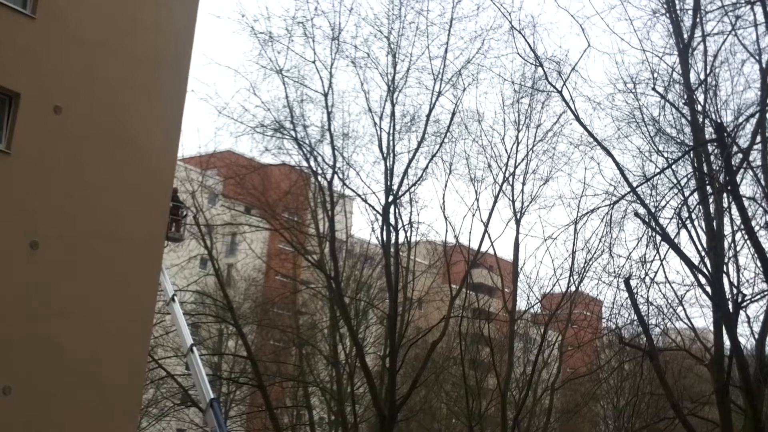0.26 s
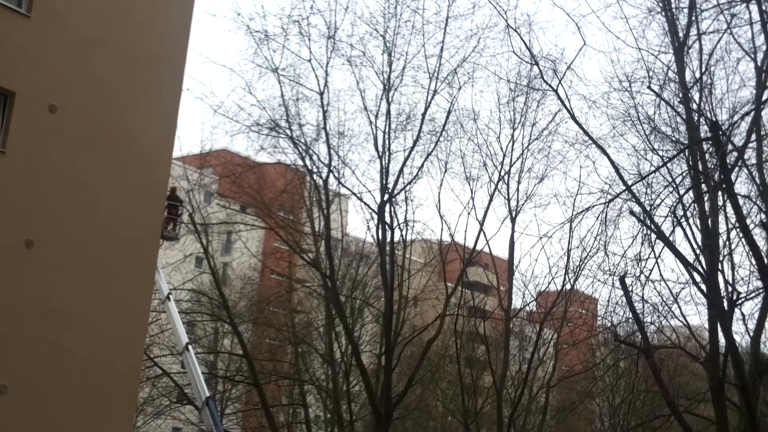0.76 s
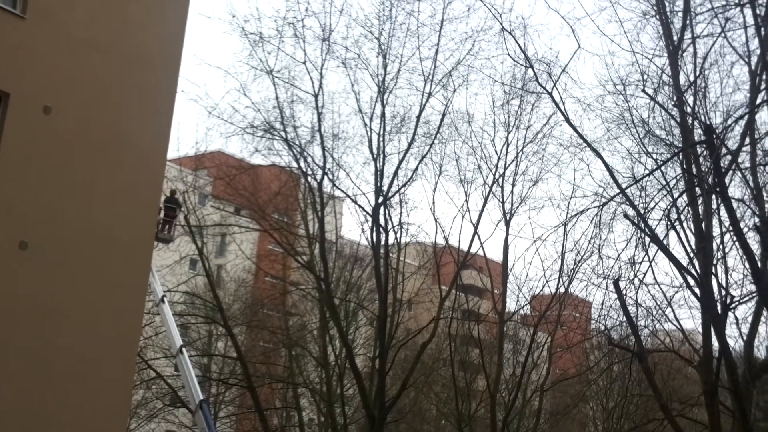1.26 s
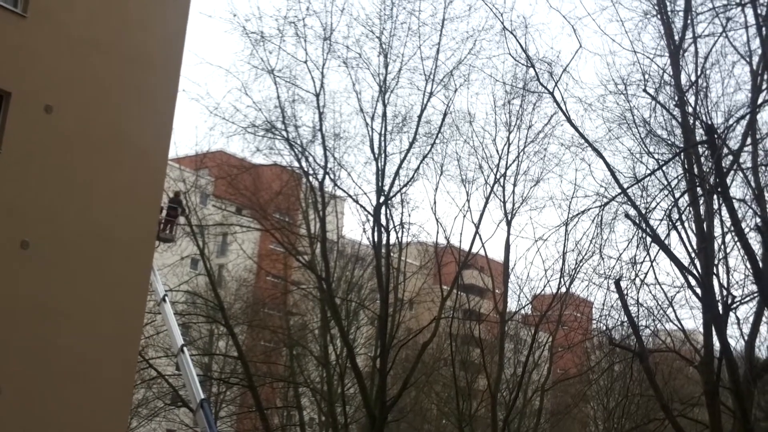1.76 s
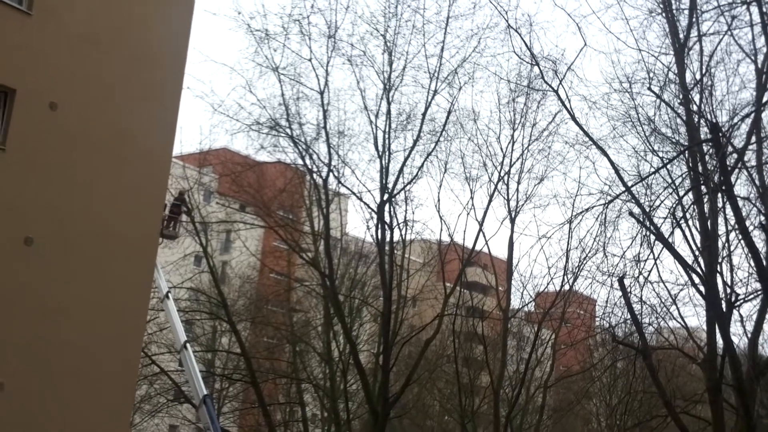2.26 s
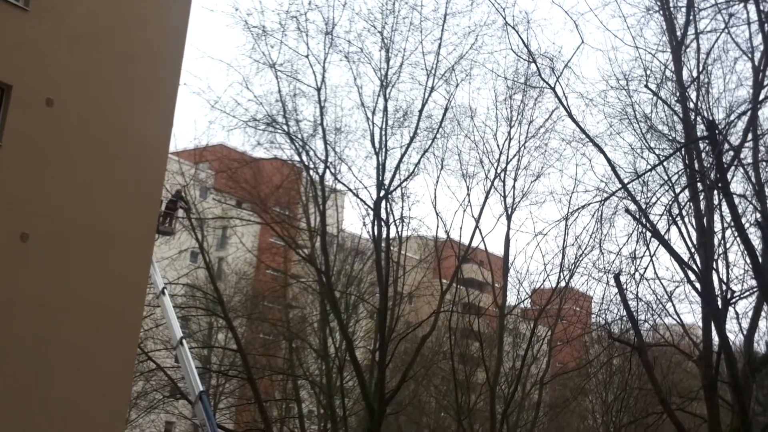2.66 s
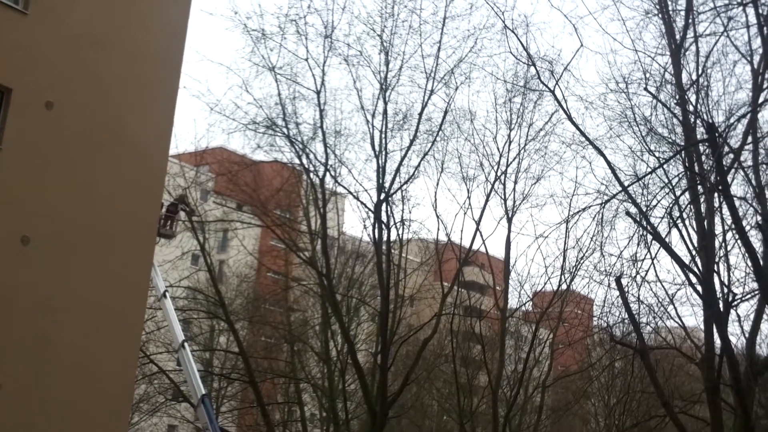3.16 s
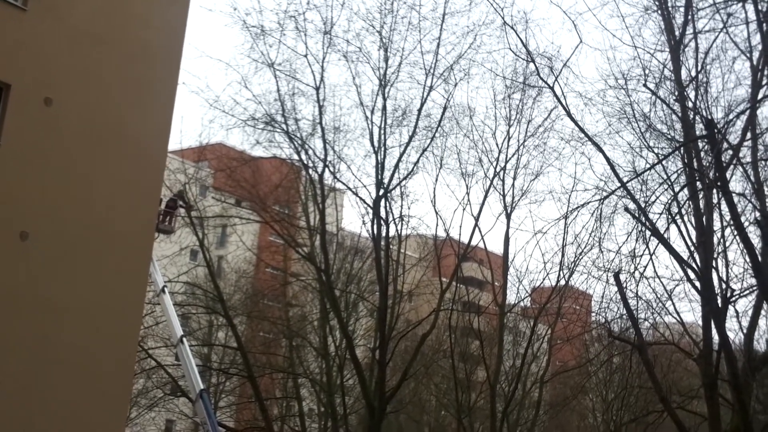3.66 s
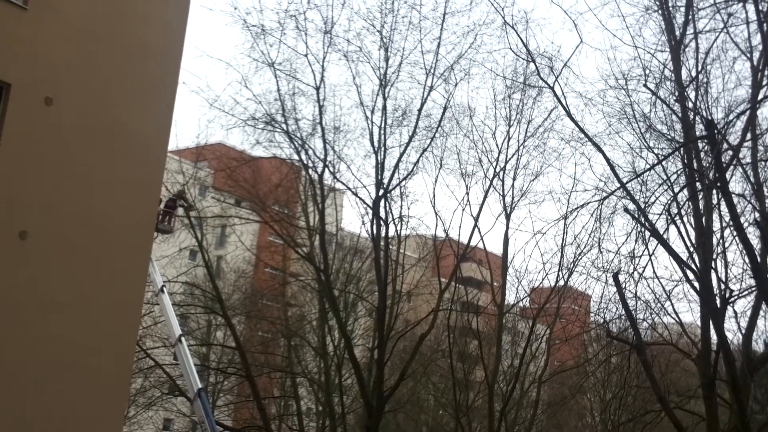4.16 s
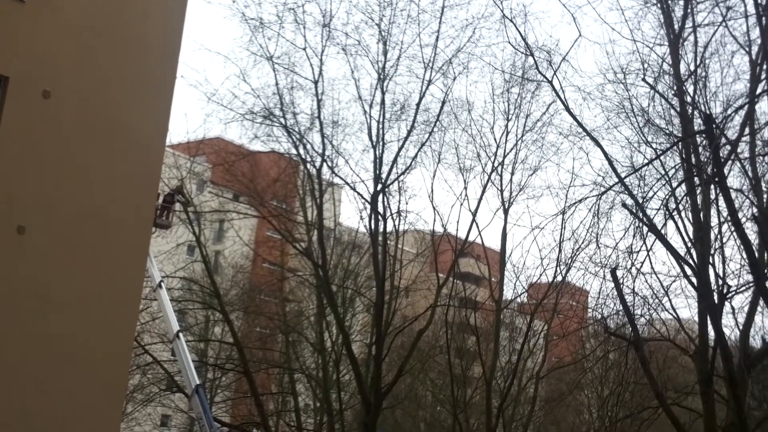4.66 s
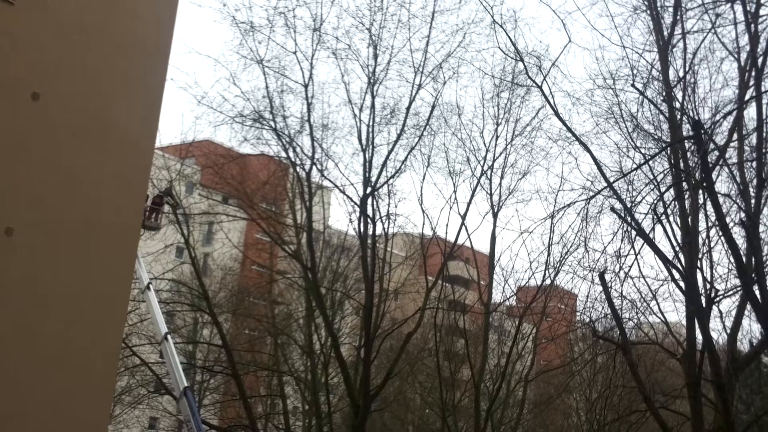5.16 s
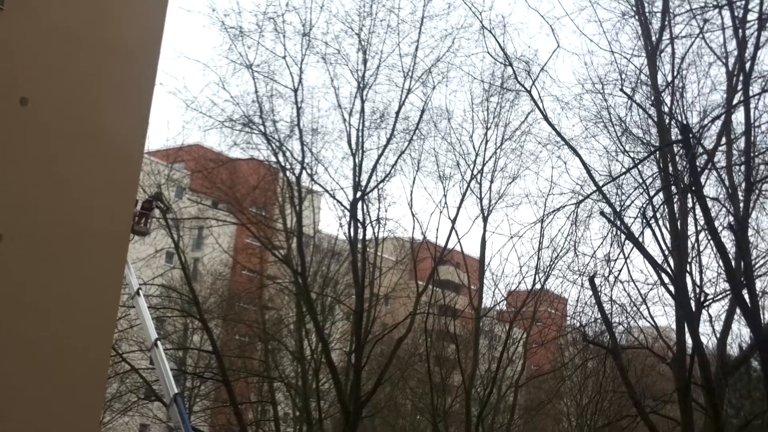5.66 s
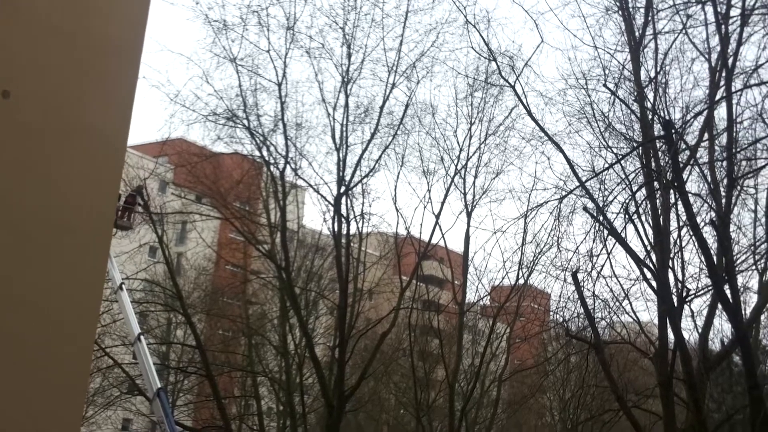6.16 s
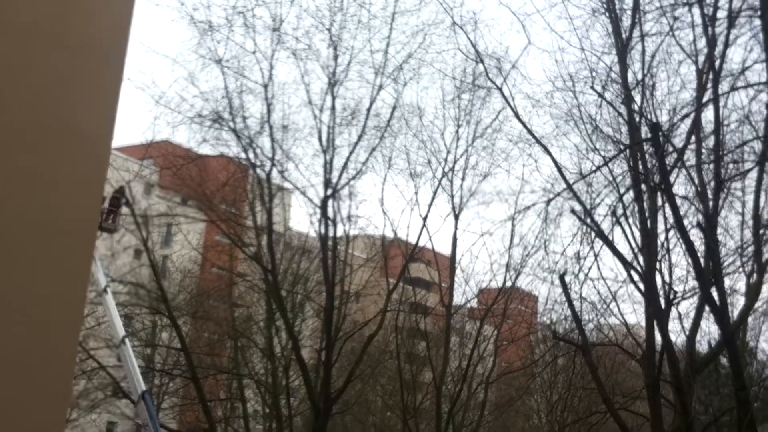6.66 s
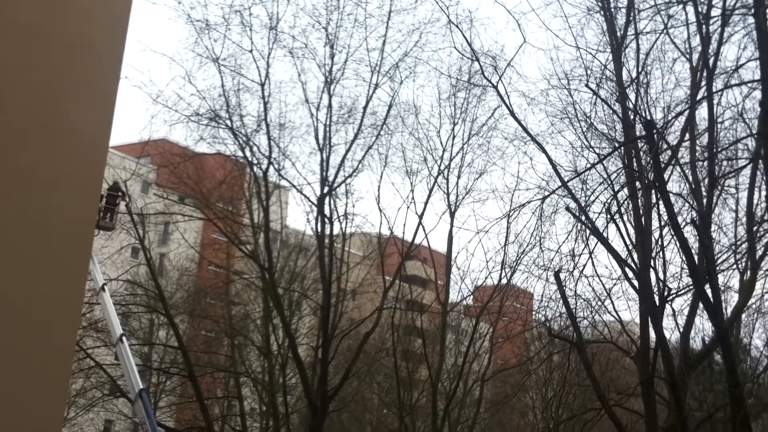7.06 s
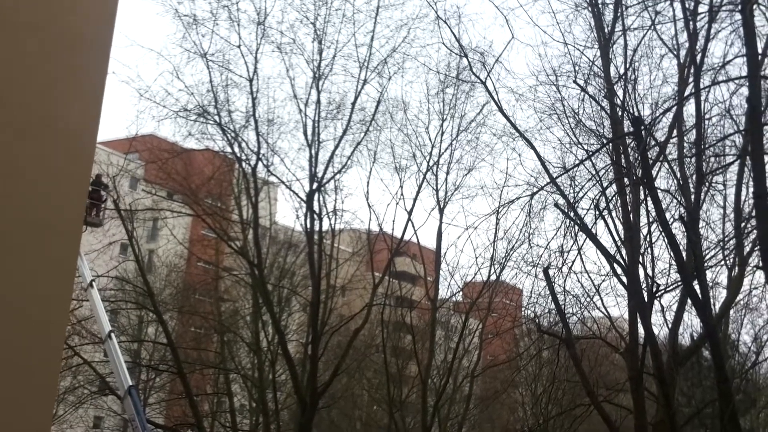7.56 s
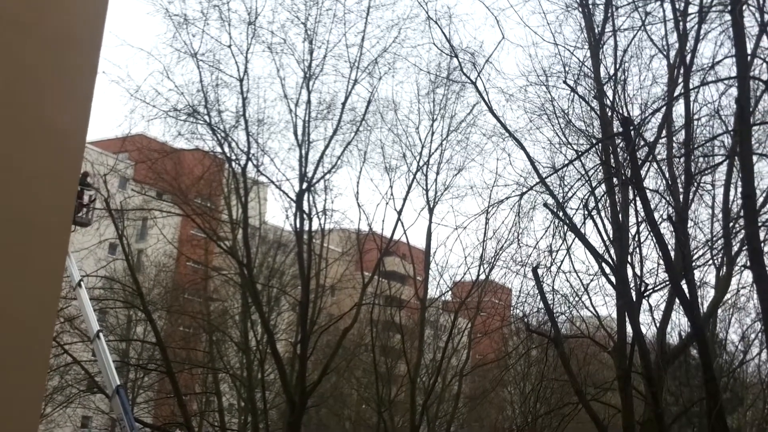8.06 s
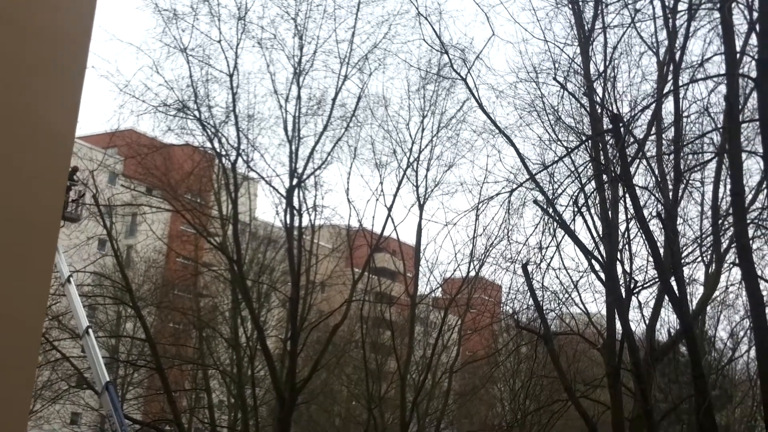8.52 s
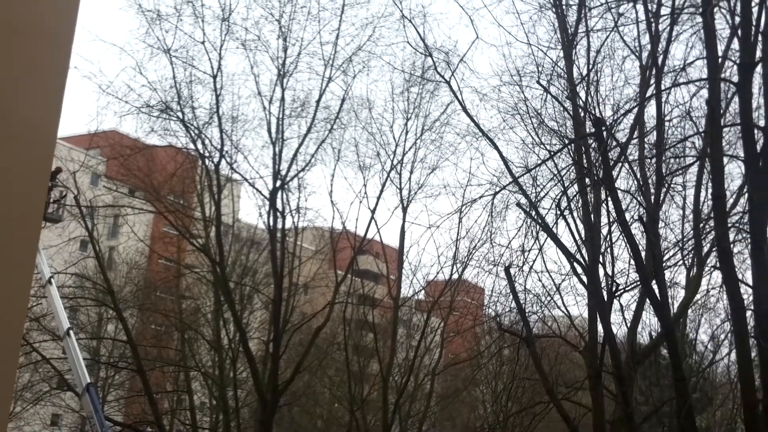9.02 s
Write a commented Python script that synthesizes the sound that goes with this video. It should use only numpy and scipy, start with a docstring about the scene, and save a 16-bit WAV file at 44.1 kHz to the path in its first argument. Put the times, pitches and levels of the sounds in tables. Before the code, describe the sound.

An outdoor yard among tall buildings, heard from a distance. Throughout, a lift's diesel engine rumbles softly with a steady, slightly wavering pump hum. From 0 to 2.9 seconds a chainsaw idles quietly, its slack chain clinking and jingling irregularly, with sharper metallic knocks around 0.5 and 2.4 and a pause or two. At 2.9 the saw growls and revs up, a short bright blip until about 3.5, then its pitch sinks. At 4.0 it climbs again and cuts until 6.2 in rasping, buzzing surges, chain hissing and bar ringing, house fronts throwing back echoes. It races slightly higher at the end, then glides down, fading by about 7.1. A faint crackle at 7.2 leads to a sharp twig snap at 7.36. From 7.9 to just past 9 seconds, loose chain clinks return, clearer than before, over the hum.

```python
"""A yard between tall blocks of flats: far off, a two-stroke chainsaw prunes a tree from a lift bucket.
It idles with a clinking chain, is blipped once, cuts in surges for two seconds, races free and runs down.
Crank speed drives the exhaust harmonics and filtered firing noise; knocks ring the steel, a twig snaps.
Firing noise and wavering tones make the lift's engine and pump hum; house fronts echo the saw and the twig."""
import sys
import numpy as np
from scipy import signal
from scipy.fft import rfft, irfft
from scipy.io import wavfile
from scipy.ndimage import uniform_filter1d

SR = 44100
rng = np.random.default_rng(int(sys.argv[2]) if len(sys.argv) > 2 else 0)


def wrap_up_sound(samples):
    """Save the sound to the file named by the first command line argument, as 16-bit audio."""
    columns = np.atleast_2d(samples).T
    # keep every value between -1 and 1, then stretch to whole-number steps
    tamed = np.clip(columns, -1, 1)
    steps = np.round(tamed * 32767).astype(np.int16)
    wavfile.write(sys.argv[1], SR, steps)


N = 409688
TIME = np.arange(N) / SR

# squeezes of the trigger: (opens t/s, closes t/s, how far 0-1)
PULLS = [(2.895, 3.525, 0.9), (3.985, 6.22, 0.64)]
# the clutch takes the chain along between these crank speeds
CLUTCH_SLIPS_HZ, CLUTCH_GRIPS_HZ = 51.7, 68.5


def saw():
    """Firings drive the exhaust note, its bark and the rasp of the engine; the running chain hisses."""
    # load on the engine: (t/s, share by which every second firing is weakened 0-1, exhaust note level/dB)
    load = [(2.95, .3, -62), (3.2, .1, -45.5), (3.28, 0, -42), (3.38, .2, -36.5), (3.51, .41, -40),
            (3.59, 0, -44), (3.85, .26, -50), (4.02, .35, -55), (4.25, .5, -42), (4.6, .2, -42),
            (4.97, .49, -37), (5.4, .05, -35.5), (5.9, .16, -39.5), (6.02, .38, -36.5), (6.21, .2, -38.5),
            (6.27, .11, -44), (6.42, .11, -47.5), (6.85, .37, -57), (7.1, .4, -65)]
    # surges of the saw at full speed: (t/s, length/s, level/dB)
    surges = [(3.238, .05, 3.2), (3.315, .08, 2.5), (3.465, .05, 2.5), (4.23, .07, 4), (4.41, .05, 2.5),
              (4.828, .06, 3.8), (4.977, .06, 3.8), (5.22, .07, 4.5), (5.37, .08, 3), (5.562, .05, 4),
              (5.73, .06, 4.5), (5.955, .07, 5.5), (6.19, .04, 3)]
    # intake growls as the engine picks up speed: (t/s, length/s, level/dB)
    gulp_times = [(2.925, 0.15, -31), (4.17, 0.42, -40), (5.94, 0.12, -32.5)]
    # colour of the exhaust bark: (f/Hz, level/dB per Hz)
    bark_spectrum = [(90, -22.5), (150, -19), (200, -3), (270, -24.5), (350, -6.5), (450, -22), (580, -8),
                     (720, -1.5), (900, 2), (1100, -7), (1400, -2.5), (1700, -24), (2600, -53)]
    # colour of the engine's rasp: (f/Hz, level/dB per Hz)
    rasp_spectrum = [(900, -8), (1450, 0.5), (1650, -3.5), (1900, 1), (2300, 0), (2750, -2.5), (3200, 1),
                     (3900, -4.5), (4600, -0.5), (6000, -16.5)]
    # colour of the idling saw: (f/Hz, level/dB per Hz)
    idle_spectrum = [(1410, -29), (2400, -14), (2810, -3), (3120, -3), (3510, 0), (4710, 3), (5440, -1),
                     (6680, -1.5), (7180, 1.5), (7770, -8), (8960, -8.5), (10800, -15), (15100, -17),
                     (16000, -16)]
    # resonances of the air box: (f/Hz, width/Hz, level/dB)
    intake = [(460, 70, 2), (585, 110, 3.5), (830, 80, -1.5), (940, 70, -3.5)]
    # level laws, each: (level/dB at racing speed, rise/dB per doubling of speed,
    # rise/dB on fully open throttle, share of a surge)
    bark_law = (-37, 9, 0.5, 0.45)
    rasp_law = (-32, 7.5, 0.2, 0.65)
    chain_law = (-28.5, 10, 4, 1)
    growl_law = (-43, 2.5, -0.5, 1)
    racing_hz = 200

    speed = crank_speed()
    misfire, note_db = in_time(load)
    throttle = sum(far * held(opens, closes - opens, attack=0.0042, release=0.016)
                   for opens, closes, far in PULLS)
    surge_db = sum(db * held(s, length, attack=.015, release=.075) for s, length, db in surges)
    gulps = sum(from_db(db) * held(s, length, attack=0.06, release=0.06) for s, length, db in gulp_times)
    clutch = np.clip((speed - CLUTCH_SLIPS_HZ) / (CLUTCH_GRIPS_HZ - CLUTCH_SLIPS_HZ), 0, 1)
    turns = np.cumsum(speed * (1 + .003 * drift(45))) / SR

    white = rng.standard_normal((4, N))
    firing = puffs(turns, misfire, sharpness=1.44, uneven_db=3.5)
    new_turn = np.diff(np.floor(turns), prepend=0)
    pops = rms_one(new_turn * firing)
    bark_source = pops + 0.31 * rms_one(firing * white[0])
    bark = evened(yard(colour(bark_source, bark_spectrum), t60=1.0, wet_db=16.0))
    rasp_source = pops + 1.15 * rms_one(firing * white[1])
    rasp = evened(yard(colour(rasp_source, rasp_spectrum), t60=0.52, wet_db=19.0))
    # the air box breathes noise along with the pops, and the yard throws it back
    breath = resonate(resonate(pops + .9 * white[3], intake), intake)
    growl = evened(yard(breath, t60=0.2, wet_db=3))
    chain = running_chain(turns, speed, misfire, throttle, firing, pops, white)

    controls = np.array([np.ones(N), np.log2(speed / racing_hz), throttle, surge_db])
    layers = [(bark_law, bark), (rasp_law, rasp), (chain_law, chain), (growl_law, growl)]
    running = sum(from_db(np.dot(law, controls)) * layer for law, layer in layers)
    note = exhaust_note(turns, speed, misfire, note_db + 0.45 * surge_db)
    idle_noise = rms_one(yard(colour(white[1] * (1.0 + firing), idle_spectrum), t60=0.52, wet_db=-4.0))
    idle = from_db(-51.0 + 0.053 * drift(16)) * idle_noise
    return clutch * running + gulps * growl + note + idle


def crank_speed():
    """Each pull spins the engine up until the load holds it; let go, it runs down towards idle."""
    # the speed at which mixture and wood hold the engine: (t/s, f/Hz in turns per second)
    top_speed = [(3.33, 195), (3.39, 200), (3.53, 205.3), (4.22, 180), (4.33, 188), (4.52, 195), (5.0, 195),
                 (5.06, 199.5), (5.14, 201.7), (5.42, 203.5), (5.58, 202), (5.7, 204.8), (5.84, 206),
                 (6.06, 206.7), (6.2, 223.5)]
    idle_hz, unchecked_hz = 41, 350
    spin_up_s, run_down_s = .6, .615  # time constants
    pickup_s = .03  # the engine answers the trigger a moment later
    top, = in_time(top_speed)
    speed = np.full(N, float(idle_hz))
    for opens, closes, _ in PULLS:
        speed = np.minimum(approach(speed, opens + pickup_s, unchecked_hz, spin_up_s), top)
        speed = approach(speed, closes + pickup_s, idle_hz, run_down_s)
    return speed


def puffs(turns, misfire, sharpness, uneven_db):
    """One dying puff per crank turn, each with its own strength; misfire weakens every second one."""
    index = turns.astype(int)
    uneven = from_db(uneven_db * np.clip(rng.standard_normal(4000), -2, 2))
    strength = uneven[index] * (1 - misfire * (index % 2))
    return strength * np.exp(-sharpness * (turns % 1))


def exhaust_note(turns, speed, misfire, note_db):
    """Harmonics of the firing rate; failed firings add half-orders between them."""
    # exhaust at racing speed: (harmonic number, level/dB against the note)
    harmonics = [(1.0, -6.5), (2.0, -13.5), (3.0, 1.4), (4.0, -7), (5.0, -10), (6.0, -19.5), (7.0, -15),
                 (8.0, -18.5), (9.0, -13), (10.0, -17), (11.0, -12), (12.0, -25), (13.0, -6), (15.0, -17.5),
                 (18.0, -11.0), (21.0, -18), (25.0, -7), (30.0, -16), (36.0, -19.4), (40.0, -24)]
    # exhaust while the engine speeds up or runs down: (harmonic number, level/dB against the note)
    glide_harmonics = [(1, 1), (2, -11), (3, 1), (4, 0), (5, 3), (6, 3), (7, 2), (8, -3), (10, -4),
                       (13, -3), (20, -13), (40, -15)]
    glide_below_hz, glide_range_hz = 194, 18
    sounding = np.clip(speed / CLUTCH_GRIPS_HZ - 1, 0, .25) * 4
    on = sounding > 0
    phase, out = 2 * np.pi * turns[on], np.zeros(N)
    gliding = np.clip((glide_below_hz - speed[on]) / glide_range_hz, 0, 1)
    for k in np.arange(1, 41):
        racing_db = np.interp(k, *np.transpose(harmonics)) + path_lift_db(k * speed[on])
        glide_db = np.interp(k, *np.transpose(glide_harmonics))
        own_db = (1 - gliding) * racing_db + gliding * glide_db
        start = rng.uniform(0, 2 * np.pi, 2)
        # uneven firing shakes the phase of the gliding harmonics and the level of all of them
        stumble_rad = .58 * gliding * drift(40)[on]
        waver_db = (1.9 + 1.8 * gliding) * drift(26)[on]
        out[on] += from_db(note_db[on] + own_db + waver_db) * np.sin(k * phase + start[0] + stumble_rad)
        if k < 14:
            half_lift_db = .6 * path_lift_db((k + .5) * speed[on])
            half_db = note_db[on] - 1.12 * k - 7 * (k == 1) + half_lift_db
            half_level = misfire[on] * from_db(half_db + 5.3 * drift(25)[on])
            out[on] += half_level * np.sin((k + .5) * phase + start[1])
    # so small an outlet radiates no bass
    note = signal.sosfilt(signal.butter(4, 185, "high", fs=SR, output="sos"), out * sounding)
    return yard(note, t60=6.1, wet_db=-9.0)


def path_lift_db(hz):
    """Narrow fixed-frequency lifts of a passing partial, as echo paths reinforce it."""
    # lifts along the echo paths: (f/Hz, half-width/Hz, level/dB)
    path_lifts = [(277, 10, 14.7), (388, 8, 13.8), (438, 21, 26.5), (516, 9, 13.5), (622, 10, 3.2),
                  (817, 14, 14.0), (884, 28, 10.9), (1009, 33, 13.8), (1084, 36, 9.0), (1216, 13, 15.5),
                  (1274, 22, 22.9), (1382, 20, 10.5), (1419, 21, 20.0), (1560, 10, 10.7), (1764, 11, 8.5),
                  (1852, 12, 20.5), (2148, 19, 11.9), (2241, 27, 10.8), (2927, 15, 9.5), (3122, 27, 9.1),
                  (3315, 20, 6.3), (3505, 18, 6.6), (3672, 20, 8.5), (3869, 19, 7.5), (4287, 31, 11.4),
                  (4702, 26, 10.3)]
    grid = np.arange(0, 10000, 4.)
    lift_db = sum(db / (1 + ((grid - centre) / width) ** 2) for centre, width, db in path_lifts)
    return np.interp(hz, grid, lift_db)


def running_chain(turns, speed, misfire, throttle, firing, pops, white):
    """Links slap in time with the crank and set the bar ringing; coasting, the chain sounds duller."""
    # colour of the driven chain: (f/Hz, level/dB per Hz)
    chain_spectrum = [(2240, -29), (3800, -7.5), (5100, -3), (6070, 1), (6690, 0), (7060, 1.5), (7410, 0),
                      (8560, -11.5), (10200, -10.5), (11600, -24), (13000, -21.5), (16000, -43)]
    # colour of the coasting chain: (f/Hz, level/dB per Hz)
    coasting_spectrum = [(2240, -51), (3800, 6.5), (4920, 10.5), (5320, 8), (5970, 3.5), (6980, 9.5),
                         (7680, 1.5), (8360, -5.5), (9420, -7.5), (11600, -21.5), (13600, -24),
                         (15200, -24), (16000, -65)]
    # resonances of the guide bar: (f/Hz, width/Hz, level/dB)
    bar_modes = [(3716, 220, -3.5), (4090, 220, 0.5), (4320, 150, -3), (4776, 28, 5), (5520, 940, -5.5),
                 (6350, 80, -20), (7300, 190, -5), (9200, 150, -26)]
    # top treble of the hiss: (t/s, level/dB)
    treble = [(3.1, 11.5), (3.4, -1.5), (3.85, 10.5), (4.3, 5.5), (4.6, 6), (5.3, 4), (6, 3), (6.35, -2.5),
              (6.7, 6), (7.2, 18.5)]
    slaps = puffs(turns, misfire, sharpness=2.4, uneven_db=7.5)
    links = rms_one(white[2] * (0.17 + slaps)) + 1.06 * pops
    bar_ring = rms_one(resonate(white[0] * (0.28 + firing) + 0.35 * pops, bar_modes))
    racing = colour(links, chain_spectrum) + bar_ring
    coasting = 1.1 * colour(white[3] * (0.17 + firing), coasting_spectrum)
    driven = np.clip((speed - 120) / 75, 0, 1)
    taut = np.clip(driven + 0.47 * throttle, 0, 1)
    chain = np.sqrt(taut) * racing + np.sqrt(1 - taut) * coasting
    chain = (evened(yard(chain, t60=1.0, wet_db=11.0)) + bar_song()) * from_db(0.78 * drift(45))
    treble_db, = in_time(treble)
    above = signal.butter(2, 9960, "high", fs=SR, output="sos")
    return chain + (from_db(treble_db) - 1) * signal.sosfiltfilt(above, chain)


def bar_song():
    """A narrow band of ringing steel that shifts as the chain runs round the bar."""
    # singing of the bar: (t/s, f/Hz, level/dB against the hiss)
    song = [(3.0, 5400, -10), (3.3, 5430, -5.5), (3.52, 5530, -14), (4.25, 5770, -7), (4.7, 6040, -32),
            (5.3, 6060, -10), (5.8, 6100, -5.5), (6.1, 6050, -13), (6.4, 6020, -14)]
    width_hz = 200
    hz, db = in_time(song)
    low = signal.butter(2, width_hz / 2, fs=SR, output="sos")
    band = signal.sosfilt(low, rng.standard_normal((2, N)))
    phase = 2 * np.pi * np.cumsum(hz) / SR
    return from_db(db) * rms_one(band[0] * np.cos(phase) + band[1] * np.sin(phase))


def clinks():
    """Slack links knock, rebound and ring, one loudest; knocks also shake the bar and the saw's body."""
    # hard knocks on the bar: (t/s, knock level/dB, body level/dB against it, loudest link f/Hz)
    hard_knocks = [(0.0647, -38.5, -4, 7400), (0.1356, -44, -14, 7200), (0.2044, -44, -4, 4800),
                   (0.281, -36.5, -11, 6350), (0.3556, -38, -14, 6300), (0.4314, -43, -14, 9100),
                   (0.51, -30.5, -20, 9200), (0.623, -36, -16, 7200), (0.7647, -42, -14, 7400),
                   (0.8583, -39.5, -8, 6700), (1.4935, -44, -10, 7300), (1.5893, -40, -10, 6500),
                   (1.684, -39, -6, 6900), (2.2034, -44, -16, 7400), (2.278, -35.5, -12, 7600),
                   (2.385, -32.5, -18, 7660), (2.474, -34.5, -5, 6450), (2.843, -35, -3.5, 7440),
                   (2.9307, -30.5, -8.5, 6600), (2.963, -26, -7, 6800), (7.92, -36.5, -11, 6350),
                   (8.0132, -29.5, -12, 5830), (8.2703, -31.5, -4.5, 7200), (8.4082, -38.5, -8, 6600),
                   (8.4806, -32, -7.5, 7200), (8.5723, -39.5, -8, 7200), (8.721, -35.5, -6, 6900),
                   (8.7958, -38.5, 0, 6500), (8.923, -38.5, -6, 6500), (9.0257, -32.5, -6.5, 7500),
                   (9.0827, -42, -14, 6100), (9.219, -36, 0, 6600)]
    # modes of the ringing steel: (f/Hz, width/Hz, level/dB)
    link_modes = [(2000, 140, -6), (3550, 140, 1), (4260, 120, -2.5), (4800, 79, 7), (5300, 50, -7),
                  (6100, 92, -3.5), (6500, 240, 2.5), (6980, 120, 1), (7470, 78, -1), (8360, 170, -7.5),
                  (9350, 360, -1.5)]
    # colour of the knocking steel: (f/Hz, level/dB per Hz)
    clink_spectrum = [(400, -7), (900, 6), (1300, 2), (2000, -9), (2900, -1), (4700, 4), (5500, 1),
                      (6400, -16), (7500, 5), (8300, 1), (9400, -16), (11000, -12), (16000, -19)]
    # body of the saw: (f/Hz, width/Hz, level/dB)
    body_modes = [(870, 250, -18), (2010, 350, 2), (4850, 350, -4)]
    contact_s, rattle_s = .003, .018  # decay times of the sharp contact and the rattle after it
    white = rng.standard_normal((4, N))
    links, body, loudest = np.zeros((3, N))
    rebounds = rng.uniform(.007, .022, size=200)  # s until the link falls back on the bar
    for (s, db, body_db, hz), rebound in zip(hard_knocks + jingles(), rebounds):
        span = slice(int(s * SR), int(s * SR) + SR // 4)
        t = TIME[:len(TIME[span])]
        first = from_db(-1) * np.exp(-t / contact_s)
        second = from_db(-9) * (t > rebound) * np.exp(-np.abs(t - rebound) / contact_s)
        knock = from_db(db) * (np.exp(-t / rattle_s) + first + second)
        links[span] += knock
        body[span] += knock * from_db(body_db)
        link = [(hz, 800, 0)]
        loudest[span] += resonate(resonate(knock * white[3, span], link), link)
    # the low modes answer to every knock, somewhat more when the body shakes
    low_drive = .5 * links + 0.53 * body
    ringing = np.zeros(N)
    for k, mode in enumerate(link_modes):
        struck = low_drive if mode[0] < 5500 else links
        # each mode's strength wanders from knock to knock
        ringing += from_db(3 * drift(9)) * resonate(struck * white[2], [mode]) * (-1) ** k
    # the ringing is soft above about 10 kHz
    ringing = signal.sosfilt(signal.butter(4, 10500, fs=SR, output="sos"), ringing)
    steel = 0.26 * colour(links * white[0], clink_spectrum) + 0.87 * ringing + from_db(1) * loudest
    thud = 2.1 * resonate(resonate(body * white[1], body_modes), body_modes)
    return yard(steel + thud, t60=.3, wet_db=-4.5)


def jingles():
    """Light knocks at a near-regular pace, some left out: (t/s, level/dB, body level/dB, f/Hz)."""
    # spells of light jingling: (from t/s, to t/s, middle level/dB)
    spells = [(0.057, .9, -61), (1.173, 2.1, -58), (8.4, 9.15, -48)]
    gap_s, jitter_s = 0.084, 0.0048
    slots = [(s, db) for start, end, db in spells for s in np.arange(start, end, gap_s)]
    chance = rng.uniform(-1, 1, (100, 4))
    return [(abs(s + jitter_s * late), db + 11 * strong, -19, 7200 + 620 * high)
            for (s, db), (late, strong, skip, high) in zip(slots, chance) if abs(skip) < .65]


def twig():
    """Fibre by fibre, each parts with a click, a brief tearing, a short bright ring and an edge."""
    # parting fibres: (t/s, level/dB before the trims below, decay/s, edge level/dB against it)
    cracks = [(7.159, -22, .001, -7), (7.179, -23, .0009, -18), (7.3605, -1.5, .0006, -23),
              (7.3626, -1.5, .0006, -20), (7.3672, -8, .0016, -25), (7.3709, -4, .0004, -18),
              (7.377, -12, .0006, -20), (7.4066, -19, .0005, 2)]
    # colour of the crack: (f/Hz, level/dB per Hz)
    crack_spectrum = [(1500, -21), (4500, -27), (5900, -13.5), (6700, 3.5), (7400, -8), (8200, -17),
                      (10000, -18), (15000, -44)]
    # ring of the splinter: (f/Hz, width/Hz, level/dB)
    splinter = [(7130, 940, 0.5)]
    # colour of the sharp edge: (f/Hz, level/dB per Hz)
    edge_spectrum = [(1500, 4), (4000, -4), (9000, 0), (13000, -3), (16000, -8)]
    snap_db, tear_db, edge_trim_db = 1.5, -15, -4.5
    sign, snaps = rng.choice([-1, 1], N), np.zeros(N)
    for s, db, _, _ in cracks:
        snaps[int(s * SR)] = from_db(db + snap_db)
    snaps += sign * sum(burst(s, decay) * from_db(db + tear_db) for s, db, decay, _ in cracks)
    edges = sum(burst(s, decay) * from_db(db + edge_db + edge_trim_db) for s, db, decay, edge_db in cracks)
    ring = 0.8 * colour(snaps, crack_spectrum) + 3.5 * resonate(resonate(snaps, splinter), splinter)
    return yard(ring + colour(edges * sign, edge_spectrum), t60=0.17, wet_db=-6.5)


def drone():
    """A soft, wavering low tone swells under the racing saw at the end of the cut."""
    swell = held(5.92, 0.63, attack=0.069, release=0.081)
    return from_db(-61.5) * swell * wavering(122.8 * TIME, flutter=0.61)


def lift():
    """A diesel engine rumbles with its firings while the hydraulic pump whines."""
    # steady pump tones: (f/Hz, level/dB)
    pump = [(224.3, -58.5), (448.4, -50.5)]
    # fainter tones, the first at the firing rate: (f/Hz, level/dB, flutter 0-1)
    hum_tones = [(38.6, -73, 1), (184, -65, 0.7), (389.6, -64.5, 0.3), (772, -64, 0.9), (1227, -65, 0.54),
                 (1440, -63, 0.9), (1447, -66.5, 1), (1576, -71, 0.2), (1866, -62.5, 1), (2210, -67, 0.7)]
    # colour of the rumble: (f/Hz, level/dB per Hz)
    rumble_spectrum = [(25, -42), (60, -11.5), (100, -15), (140, -7.5), (175, 2), (340, 2.5), (430, 2.5),
                       (620, 3.5), (1050, -2.5), (1450, -1.5), (1720, -3), (2050, -1.5), (2550, -8),
                       (3500, -13.5)]
    run_time = np.cumsum(1 + 0.002953 * drift(4)) / SR
    knock = 5.0 + puffs(hum_tones[0][0] * run_time, misfire=0, sharpness=3.6, uneven_db=3.5)
    rumble_noise = rms_one(colour(knock * rng.standard_normal(N), rumble_spectrum))
    rumble = from_db(-47.0 + 0.48 * drift(1.9)) * rumble_noise
    whine = sum(from_db(db) * wavering(hz * run_time, flutter=.13) for hz, db in pump)
    hum = sum(from_db(db) * wavering(hz * run_time, flutter) for hz, db, flutter in hum_tones)
    return rumble + whine + hum


def yard(x, t60, wet_db):
    """Direct sound, then scattered echoes that swell with each house front and die away."""
    # house fronts: (delay t/s, level/dB before the common lift)
    walls = [(0.049, -30), (0.112, -3.5), (.19, 6.5), (0.289, 0)]
    common_lift_db = 11.0
    t = TIME[:2 * SR]
    swell = 1 + sum(from_db(db + common_lift_db) * np.exp(-((t - s) / 0.0052) ** 2) for s, db in walls)
    echoes = rng.standard_normal(len(t)) * swell * from_db(-60 * t / t60)
    return x + from_db(wet_db) * signal.oaconvolve(x, echoes / np.linalg.norm(echoes))[:N]


def colour(x, spectrum):
    """Causal (minimum-phase) filter with the given spectrum, unit power gain."""
    size = 4096
    hz, db = np.transpose(spectrum)
    grid = np.log(np.fft.rfftfreq(size, 1 / SR) + 1)
    # outside the listed range the level falls off
    beyond = np.maximum(np.log(hz[0]) - grid, 0) + np.maximum(grid - np.log(hz[-1]), 0)
    level_db = np.interp(grid, np.log(hz), db) - 33.7 * np.minimum(beyond, 1)
    cepstrum = irfft(np.log(from_db(level_db)))
    response = irfft(np.exp(rfft(2 * cepstrum[:size // 2], size)))
    return signal.oaconvolve(x, response / np.linalg.norm(response))[:N]


def resonate(x, modes):
    """Parallel two-pole resonances, wider ones dying sooner."""
    out = 0
    for hz, width, db in modes:
        r = np.exp(-np.pi * width / SR)
        feed = [(1 - r * r) / 2, 0, (r * r - 1) / 2]
        back = [1, -2 * r * np.cos(2 * np.pi * hz / SR), r * r]
        out = out + from_db(db) * signal.lfilter(feed, back, x + 1e-18)
    return out


def wavering(turns, flutter):
    """A tone of rms about 1 whose strength and phase wander."""
    waver = (1 + flutter * (drift(16) + 1j * drift(16))) / np.sqrt(.5 + flutter ** 2)
    return np.real(waver * np.exp(2j * np.pi * turns))


def drift(rate):
    """Smooth chance of spread about 1 with so many turns a second."""
    knots = rng.standard_normal(4000)
    return 1.2 * np.interp(TIME * rate, np.arange(len(knots)), knots)


def held(s, length, attack, release):
    """An envelope that rises towards 1 at time s, holds and dies away."""
    rise = 1 - np.exp(-np.clip(TIME - s, 0, length) / attack)
    return rise * np.exp(-np.maximum(TIME - s - length, 0) / release)


def burst(s, decay):
    """An envelope that jumps to 1 at time s and dies away."""
    out, start = np.zeros(N), int(s * SR)
    tail = np.exp(-TIME[:min(SR // 2, N - start)] / decay)
    out[start:start + len(tail)] = tail
    return out


def approach(x, s, goal, lag):
    """From time s on, x heads for a goal with the given time constant."""
    gap = np.interp(s, TIME, x) - goal
    return np.where(TIME < s, x, goal + gap * np.exp(-np.maximum(TIME - s, 0) / lag))


def in_time(rows):
    """Each column of a curve table, sample by sample."""
    s, *columns = np.transpose(rows)
    return [np.interp(TIME, s, c) for c in columns]


def evened(x):
    """Hold the short-time level at 1."""
    return x / np.sqrt(np.abs(uniform_filter1d(x ** 2, size=3000)) + 1e-9)


def rms_one(x):
    """Scale to rms 1."""
    return x / np.sqrt(np.mean(x ** 2) + 1e-20)


def from_db(db):
    """Decibels to gain."""
    return 10 ** (np.asarray(db) / 20)


def scene():
    """All sounds arrive alike in both channels."""
    return np.tile(saw() + clinks() + twig() + drone() + lift(), (2, 1))


def record(dry):
    """The top is cut steeply."""
    return signal.sosfilt(signal.ellip(10, .2, 70, 15900, fs=SR, output="sos"), dry)


dry = scene()
out = record(dry)
wrap_up_sound(out)
```